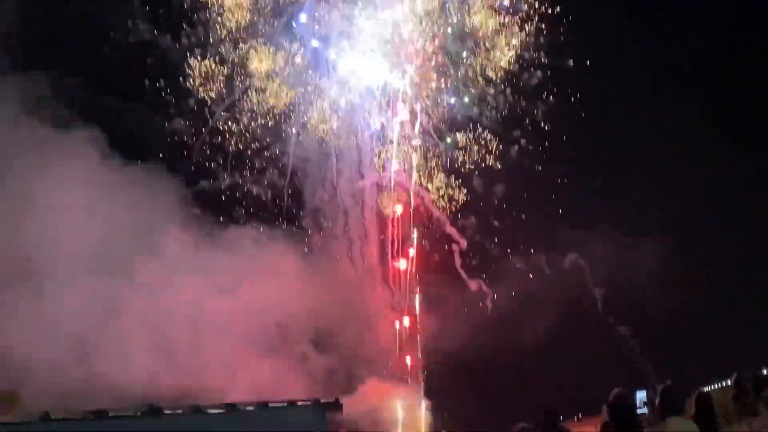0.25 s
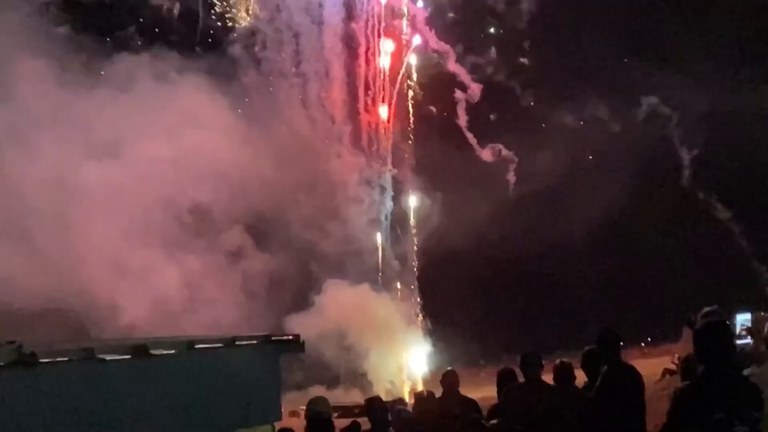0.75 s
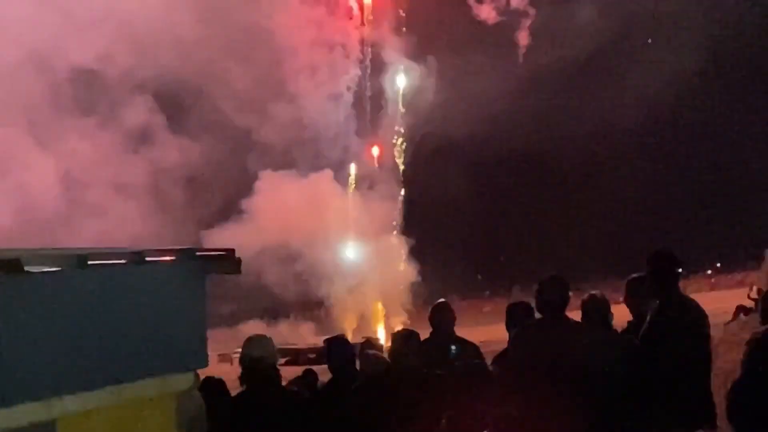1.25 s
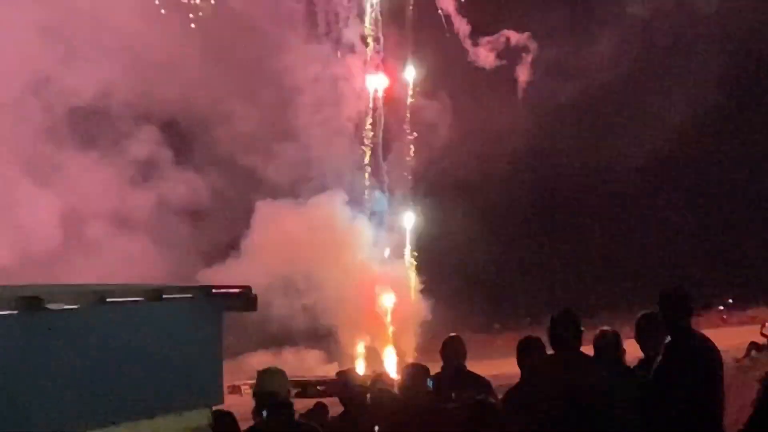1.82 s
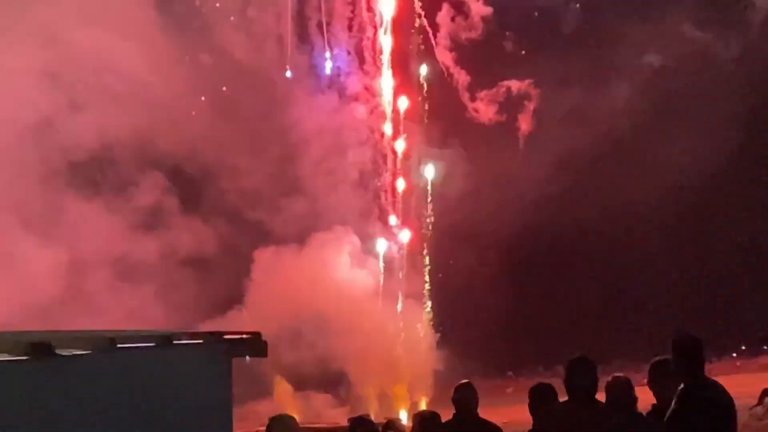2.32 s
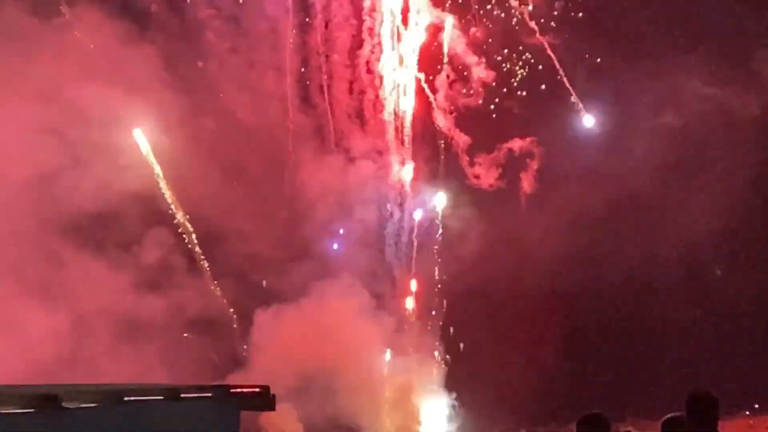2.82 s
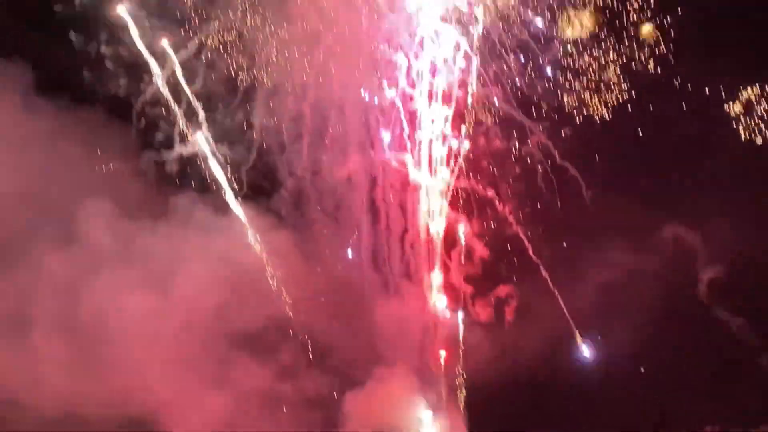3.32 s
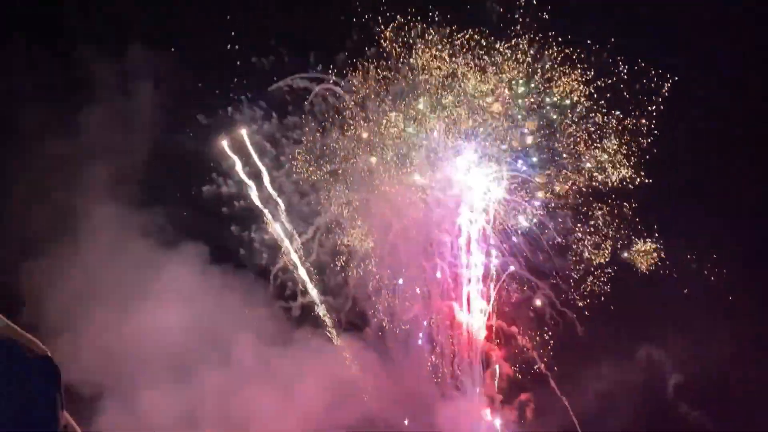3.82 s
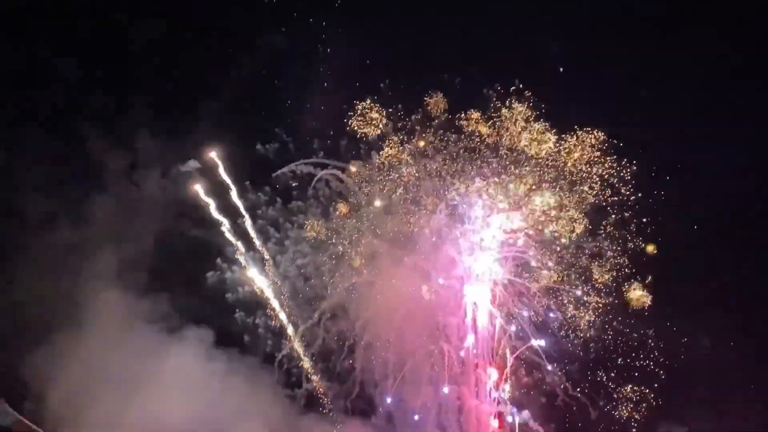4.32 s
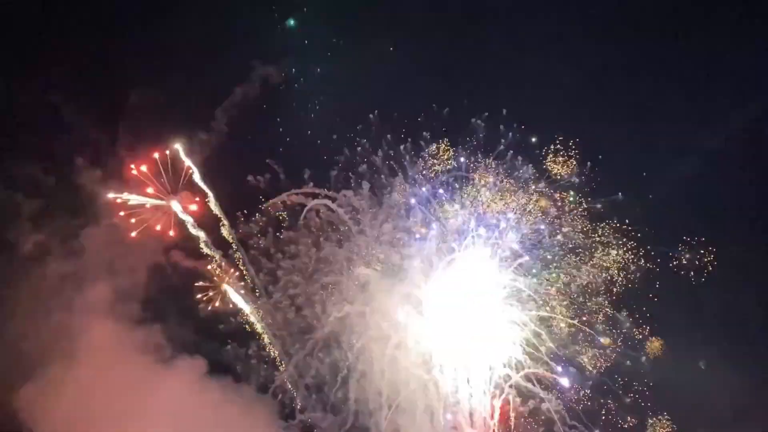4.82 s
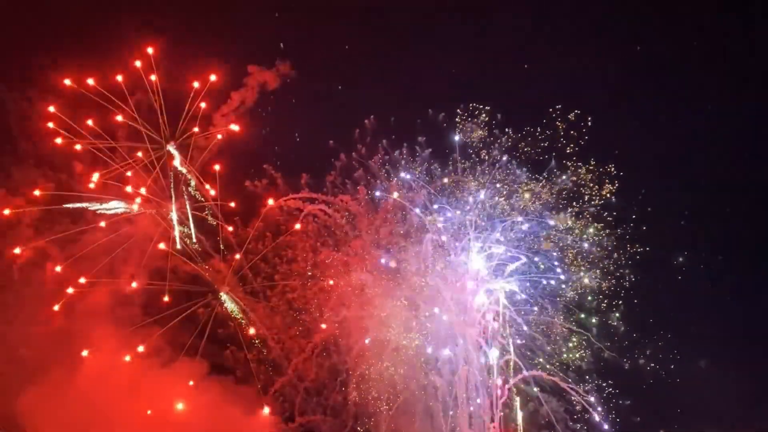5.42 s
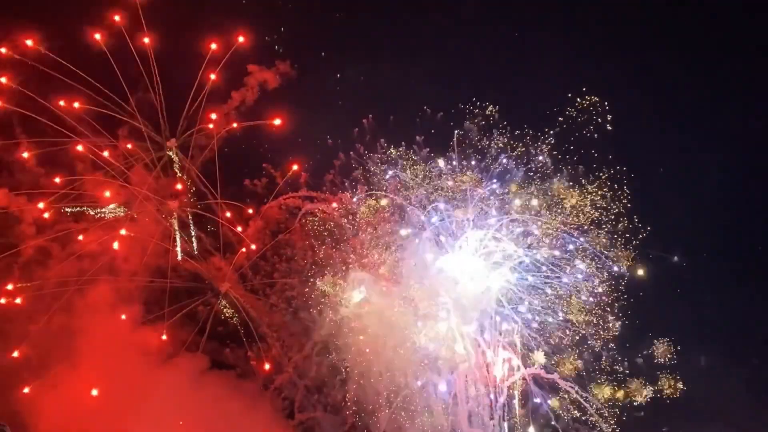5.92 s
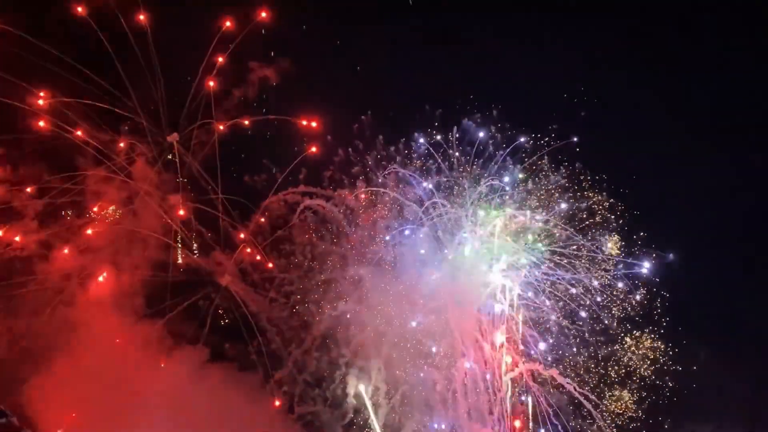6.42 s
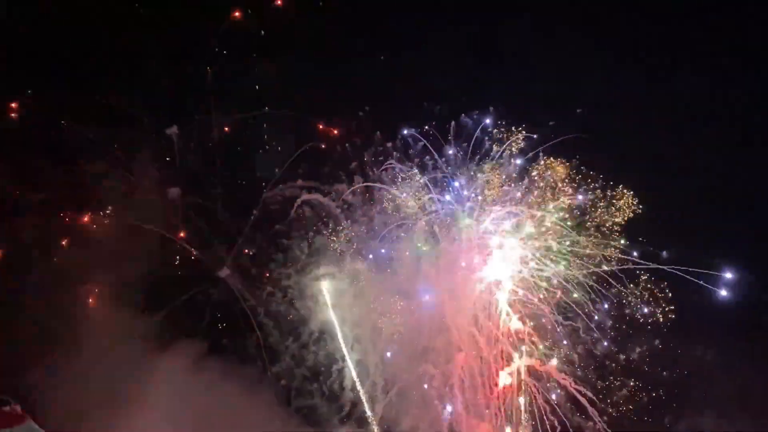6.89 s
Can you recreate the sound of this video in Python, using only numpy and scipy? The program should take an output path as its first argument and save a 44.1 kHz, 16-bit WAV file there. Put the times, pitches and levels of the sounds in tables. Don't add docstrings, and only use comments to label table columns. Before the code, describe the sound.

A fast, irregular barrage of loud, dry firework cracks with bassy bodies, close enough to round the peaks on a phone microphone in stereo. Swarms of sizzling crackle and bright star ticks run between them. Two deep launch thumps come before three seconds; heavier booms gather around five. Low rumble rolls back from the open landscape over a dull faint hiss, and bangs bunch up again at the end.

```python
import sys
import numpy as np
from scipy import signal
from scipy.fft import rfft, irfft, next_fast_len
from scipy.io import wavfile

SR = 44100
rng = np.random.default_rng(int(sys.argv[2]) if len(sys.argv) > 2 else 0)


def how_loud(loudness_db):
    steps = np.asarray(loudness_db, float) / 20
    return 10 ** steps


def inscribe(sig):
    pcm = np.round(np.clip(np.atleast_2d(sig).T, -1, 1) * 32767)
    wavfile.write(sys.argv[1], SR, pcm.astype(np.int16))


N = 315315
M = next_fast_len(N + SR)
HZ = np.fft.rfftfreq(M, 1 / SR) + 1e-3
S = 1j * HZ
PORTS = np.array([[1], [-1]])


def level(x, db):
    return x * how_loud(db) / np.sqrt(np.mean(x ** 2))


def train(s, size):
    x = np.zeros(M)
    np.add.at(x, (np.asarray(s) * SR).astype(int), size)
    return rfft(x)


def late(ms):
    return np.exp(-2 * np.pi * S * ms / 1000)


def low(hz):
    return 1 / (1 + S / hz)


def ring_high(hz, damp):
    return S * S / (S * S + damp * hz * S + hz * hz)


def smear(hz, damp):
    return (S * S - damp * hz * S + hz * hz) / (S * S + damp * hz * S + hz * hz)


def shock(ms):
    w = 2 * np.pi * S * ms / 1000
    return -SR * ms / 1000 * w / (1 + w) ** 2


def scatter(clicks, t60, db, lo_hz, hi_hz, apart):
    t = np.arange(SR // 2) / SR
    fade = np.exp(-np.log(1000) * t / t60) * (1 - np.exp(-t / 0.00011))
    mid, side = rng.standard_normal((2, M)) * irfft(clicks * rfft(fade, M), M)
    noise = rfft(mid + apart * side * PORTS)
    return noise * how_loud(db) * low(hi_hz) * (1 - low(lo_hz))


def deep(clicks):
    slope = 1 + how_loud(-11.5) * late(128.9)
    return clicks * smear(83, 14.0) * ring_high(52.4, 0.57) * slope


# time_s, raised_share (0 level to 1 raised)
PHONE_TILT = [
    (0.0, 0),
    (2.9, 0.12),
    (3.3, 0.1),
    (3.6, 1),
    (4.602, 0.86),
    (5.6, 1),
    (7.15, 0.7),
]


def tilt():
    return np.interp(np.arange(M) / SR, *np.transpose(PHONE_TILT))


def wash():
    mid, side = rng.standard_normal((2, M))
    hiss = rfft(mid + 0.45 * side * PORTS)
    hiss = hiss * low(900) * low(4000) * ring_high(250, 1.55)
    return rfft(level(irfft(hiss, M), -43))


def roll():
    rise_s, salute_fall_s, heavy_fall_s = 0.084, 0.09, 0.13
    salute_db, heavy_db, far_db = -35.5, -36, -41
    t = np.arange(SR) / SR
    power = how_loud(2 * far_db)
    for rows, fall_s, roll_db in ((SALUTES, salute_fall_s, salute_db), (BIG_SHELLS, heavy_fall_s, heavy_db)):
        s, db = np.transpose(rows)
        swell = np.exp(-t / fall_s) * (1 - np.exp(-t / rise_s)) ** 2
        answers = train(s, how_loud(2 * (db + roll_db))) * rfft(swell / swell.max(), M)
        power = power + abs(irfft(answers, M))
    return np.sqrt(power)


def rumble():
    chance = rng.random((1500, 3)).T
    s = chance[0] * N / SR
    size = how_loud(np.minimum(-4 * np.log(chance[1]), 9))
    sign = np.sign(chance[2] - .5)
    x = train(s, size * sign) + scatter(train(s, size), 0.13, -32, 130, 1370, 0.59)
    x = x * shock(1.0) * low(730) ** 2 * ring_high(126, 1.3)
    x = x / (1 + (HZ / 560) ** 6)
    return rfft(level(irfft(x, M), -3.5) * roll())


# start_s, level_db, push_ms
MORTARS = [
    (2.529, -12, 5.5),
    (2.843, -14, 5.5),
    (5.572, -29, 5.5),
    (6.053, -19, 5.5),
    (6.29, -33, 5.5),
]
# start_s, level_db
BIG_SHELLS = [
    (4.985, 1),
    (5.104, -0.5),
    (5.322, 3),
    (5.513, -27),
]


def thumps():
    lifts = sum(train([s], how_loud(db + 7)) * shock(ms) for s, db, ms in MORTARS)
    s, db = np.transpose(BIG_SHELLS)
    shells = train(s, how_loud(db)) * shock(3.4) * ring_high(162, 0.64) * low(470) ** 2
    return shells - deep(lifts) * low(170) * low(200) * late(2.3)


# start_s, length_s, level_db
SPARK_SWARMS = [(0.14, 0.53, -36.5), (0.623, 0.57, -33.5), (1.144, 0.19, -44), (1.337, 0.45, -34.5),
                (1.736, 0.23, -43.5), (1.948, 0.43, -37), (2.33, 0.63, -38.5), (2.9, 0.48, -45),
                (3.09, 0.35, -35), (3.49, 0.45, -36), (3.386, 0.2, -40), (3.875, 0.24, -44.5),
                (4.04, 0.22, -37), (4.165, 0.28, -36.5), (4.34, 0.48, -37), (4.78, 0.43, -42),
                (5.192, 0.38, -36.5), (5.51, 0.22, -43), (5.666, 0.14, -37.5), (5.76, 0.37, -35),
                (6.043, 0.31, -32.5), (6.29, 0.12, -36.5), (6.7, 0.12, -48), (6.8, 0.35, -41.5)]
SPARSE = .7


def swarm_db():
    swell_s, die_s, embers_db = .07, .07, -62
    t = np.arange(M) / SR
    power = how_loud(2 * embers_db)
    for s, length, db in SPARK_SWARMS:
        shape = np.clip(np.minimum((t - s) / swell_s, (s + length - t) / die_s), 0, 1)
        power = power + (how_loud(db) * shape) ** 2
    return 10 * np.log10(power)


def swarm_lift_db():
    return swarm_db() - np.max(np.transpose(SPARK_SWARMS)[2])


def crackle(count=6000):
    chance = rng.random((count, 3)).T
    s = np.repeat(rng.random(count // 3) * N / SR, 3) + 0.023 * chance[0]
    size = how_loud(np.minimum(-4.5 * np.log(chance[1]), 13))
    lift_db = swarm_lift_db()
    dense = how_loud(SPARSE * lift_db[(s * SR).astype(int)])
    lit = np.repeat(rng.random(count // 3), 3) < dense
    size = size * lit / np.sqrt(dense)
    wide = chance[2] < .3
    ticks = train(s, size * ~wide) * shock(0.095) + .5 * train(s, size * wide) * shock(0.21)
    mid, side = rng.standard_normal((2, M))
    sizzle = rfft(mid) * shock(0.15) + 1.4 * rfft(side) * shock(0.2) * low(870) * PORTS
    thin_db = .5 * lift_db - 4 * tilt()
    x = level(irfft(ticks, M), 1.0) + level(irfft(sizzle, M), -1.9) * how_loud(thin_db)
    return rfft(x * how_loud(swarm_db()))


def swarm_stars(count=520):
    star_db, spread_db, follows, raised_db = -23.5, 4, 0.14, 3
    s, size, luck = rng.random((count, 3)).T
    at = (s * N).astype(int)
    lift_db = swarm_lift_db()[at]
    db = star_db + follows * lift_db + raised_db * tilt()[at]
    db = db + spread_db * np.sqrt(12) * (size - .5)
    lit = luck < how_loud(SPARSE * lift_db)
    return at[lit] / SR, db[lit]


# start_s, level_db
SINGLE_STARS = [(0.1433, -22), (1.2322, -28), (1.767, -14), (1.9197, -32.5), (1.937, -20), (2.7852, -16),
                (2.9507, -17), (3.0045, -20), (3.0634, -24), (3.0848, -19), (3.1288, -13), (3.704, -15.5),
                (4.0232, -18), (4.0604, -17), (4.15, -8), (5.4504, -19), (5.4651, -6.5), (5.545, -23),
                (5.5827, -15.5), (6.356, -18), (6.461, -20), (6.5038, -23.5), (6.5688, -19.5),
                (6.5862, -18.5), (6.6162, -21), (6.649, -33), (6.7442, -25), (6.7751, -31), (6.7975, -22.5),
                (6.8886, -19)]
# start_s, level_db
SMALL_SHELLS = [(0.1716, -32), (0.2378, -22), (0.6279, -18), (0.64, -18), (0.693, -24), (1.434, -27),
                (2.028, -23), (2.7301, -23), (3.2273, -22), (3.287, -24), (3.3354, -25), (3.3491, -27),
                (4.1498, -27), (4.1657, -23.5), (4.2106, -24), (4.266, -21), (4.297, -22.5), (4.477, -18.5),
                (4.6562, -23), (4.704, -21), (5.287, -23), (5.4654, -30), (5.4704, -18), (5.5614, -18.5),
                (5.626, -22.5), (5.807, -21), (6.8894, -18)]


def pops():
    s, db = np.hstack([np.transpose(SINGLE_STARS), swarm_stars()])
    ticks = train(s, how_loud(db + 9.5))
    stars = shock(.12) * (ticks + scatter(ticks, 0.016, -26.5, 500, 6900, 0.53))
    s, db = np.transpose(SMALL_SHELLS)
    bursts = train(s, how_loud(db + 13))
    echoed = bursts * (1 + .3 * late(1.1))
    shells = shock(.5) * (echoed + scatter(bursts, .025, -26, 300, 4000, .5))
    return stars + shells


def overhead(stars):
    level_clear, raised_clear = 0.39, 0.49
    clear = np.clip(level_clear + (raised_clear - level_clear) * tilt(), 0, 1)
    stars = stars * low(13400) / (1 + (HZ / 15300) ** 60)
    shaded = stars / (1 + (HZ / 7500) ** 6)
    return rfft(clear * irfft(stars, M) + (1 - clear) * irfft(shaded, M))


# start_s, body_db
SALUTE_SHOTS = [(0.04, 0.5), (0.177, -1.3), (0.2447, -0.5), (0.343, -0.5), (0.4107, 0.8), (0.4306, -4),
                (0.5777, 1), (0.6155, 1.5), (0.8854, 0.1), (1.0094, 0), (1.0866, 0.5), (1.146, 0),
                (1.3402, 0.5), (1.4409, -2), (1.5314, -0.7), (1.7782, 0.5), (1.9602, -0.3), (2.1505, 2),
                (2.267, 0), (2.2851, -1.1), (2.3354, -0.2), (2.3985, 0), (2.6267, 1.5), (2.75, -0.1),
                (2.8106, 0.4),
                (3.141, 0.8), (3.2314, -0.3), (3.2738, -0.2), (3.4504, -1), (3.4594, -1), (3.6151, -2),
                  (3.7224, -1), (3.7378, -2), (3.8786, -1.6), (4.2527, -3), (4.3164, -0.2), (4.404, -2.5),
                  (4.4077, -4.5), (4.5134, -2), (4.6012, -1), (4.85, 0.5), (4.882, -5), (4.962, -3),
                  (4.9814, -3), (5.0957, -3), (5.1016, -1.5), (5.1708, -3.5), (5.2907, -1), (5.3178, -1),
                (5.7928, -1), (5.849, 0), (5.886, -0.5), (6.4055, -2), (6.6822, -0.5), (6.8143, -1),
                 (6.8342, -1.1), (6.9062, -1.5), (6.9122, -3), (6.964, -2.2), (6.9854, -2), (7.055, -2.5)]
SALUTES = SALUTE_SHOTS
# start_s, body_db, crack_db
MUFFLED_BANGS = [
    (4.8585, -1.5, -2.6),
    (4.9867, -5, -6),
    (5.1283, -5, 1.5),
    (5.3243, -9, -14),
]


def salutes():
    s, body_db = np.transpose(SALUTES)
    crack_db = 4 + 0.45 * rng.standard_normal(len(s))
    return np.hstack([[s, body_db, crack_db], np.transpose(MUFFLED_BANGS)])


# delay_ms, gain, dull_above_hz
GROUND_ECHOES = [
    (.9, -.35, 1350),
    (3.52, 1.5, 200),
]
# delay_ms, level_db
WALL_ECHOES = [
    (20.3, -30),
    (91, -20),
    (101, -22),
]


def bangs():
    s, body_db, crack_db = salutes()
    wander = rng.standard_normal((len(s), 2)).T
    body = how_loud(body_db)
    front = train(s, body) * low(837) + train(s, how_loud(crack_db)) * (1 - low(816))
    ground = 0
    for k, ((ms, gain, hz), w) in enumerate(zip(GROUND_ECHOES, wander)):
        echo = train(s + .00008 * k * w, body * how_loud(1.0 * w))
        ground = ground + gain * late(ms) * low(hz) * echo
    blast = shock(2.06) * ring_high(306, .52) * late(-.1)
    walls = sum(how_loud(db) * late(ms) for ms, db in WALL_ECHOES) * low(700)
    tail = scatter(train(s, body), 0.048, -23.5, 570, 7500, 0.4) * ring_high(616, 0.78)
    tail = tail + scatter(train(s + 0.0084, body), 0.22, -41.0, 400, 740, 1.0) * low(840)
    boom = how_loud(-4.5) * deep(front) * shock(1.8) * late(10.0) * low(53.3) ** 2
    return how_loud(2.5) * blast * ((front + ground) * (1 + walls) + tail) + boom


def scene():
    background = wash() + rumble() + thumps()
    sky = overhead(crackle() + pops())
    return irfft(background + sky + bangs(), M)[:, :N]


def roll_off(x):
    return signal.sosfilt(signal.butter(12, 17150, fs=SR, output="sos"), x)


# split_hz, damping
SPLITTERS = [
    (238, 1.41),
    (630, 1.41),
    (4100, .7),
    (11000, 1.41),
]
# pitch_hz, level_db
MIC_TONE = [(25, -9), (40, -6.5), (60, 3), (250, 0), (450, -0.5), (640, 0.5), (850, -2.5), (1400, -0.5),
            (2000, -3.5), (3000, -2.5), (4500, -5), (7000, -2), (12000, -0.5), (16000, -5)]
# pitch_hz, left_minus_right_db
PORT_LEAN = [
    (60, -1),
    (500, -1.4),
    (1300, -2),
    (2400, 1),
    (8000, 0),
    (15000, -.6),
]


def curve(rows):
    hz, value = np.transpose(rows)
    return np.interp(np.log(HZ), np.log(hz), value)


def record(dry):
    chirp = np.prod([smear(hz, damp) for hz, damp in SPLITTERS], axis=0)
    lead = 2 * np.pi * .000241 * 300 * np.logaddexp(0, (HZ - 6925) / 300)
    lead -= 0.86 * np.exp(-(np.log(HZ / 1500) / 0.39) ** 2)
    lean_db = curve(PORT_LEAN)
    ports = np.array([how_loud(lean_db / 2), how_loud(-lean_db / 2) * np.exp(1j * lead)])
    top = 1 / (1 + (HZ / 16400) ** 60)
    x = irfft(rfft(dry, M) * chirp * ports * how_loud(curve(MIC_TONE)) * top, M)[:, :N]

    raised = tilt()[:N]
    raised_lean_db, level_treble_db, raised_treble_db = -0.3, -1, -8
    x = x * how_loud(np.outer([.5, -.5], raised_lean_db * (raised - .5)))
    shaded_band = 1 / (1 + (8900 / HZ) ** 8) / (1 + (HZ / 13200) ** 16)
    treble = irfft(rfft(x, M) * shaded_band, M)[:, :N]
    treble_db = level_treble_db + (raised_treble_db - level_treble_db) * raised
    x = x + treble * (how_loud(treble_db) - 1)

    knee = .6
    rounded = knee + (1 - knee) * np.tanh((abs(x) - knee) / (1 - knee))
    mix = np.where(abs(x) < knee, x, np.sign(x) * rounded)
    return roll_off(mix)


dry = scene()
out = record(dry)
inscribe(out)
```